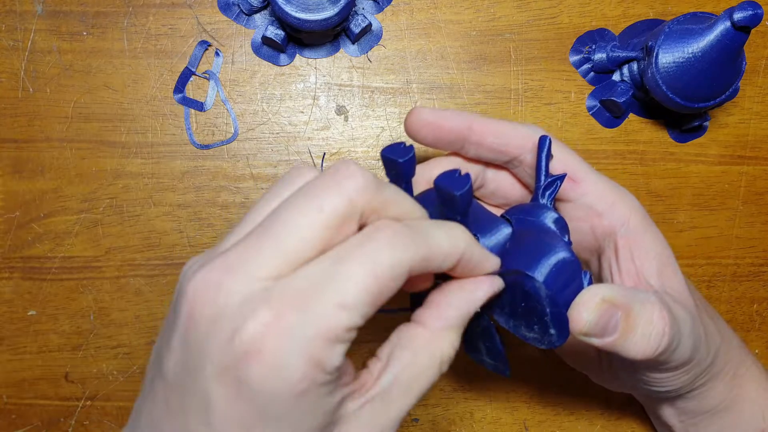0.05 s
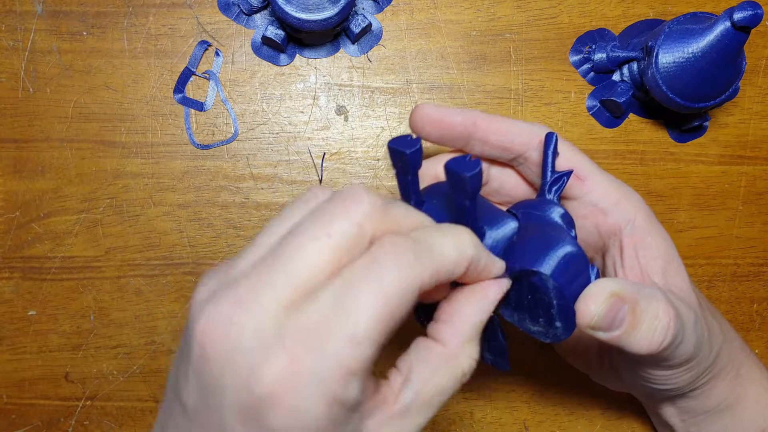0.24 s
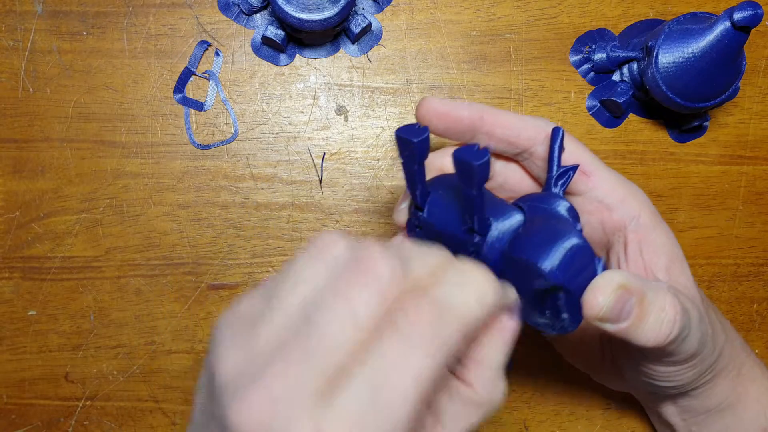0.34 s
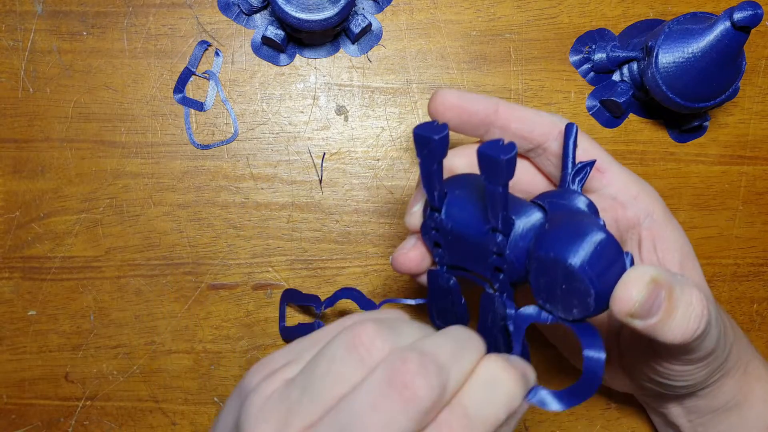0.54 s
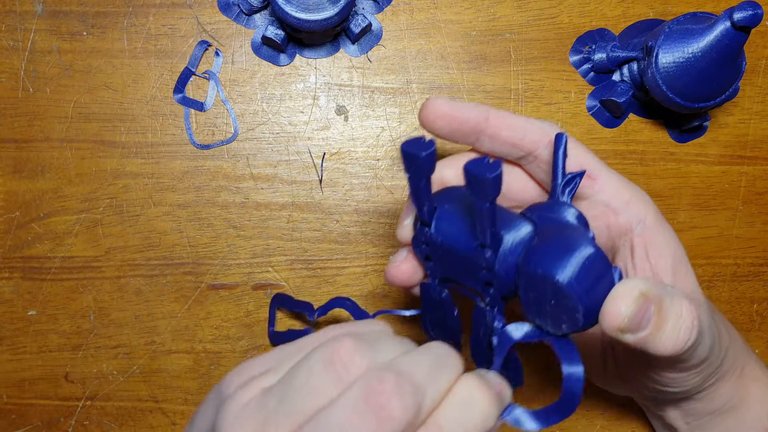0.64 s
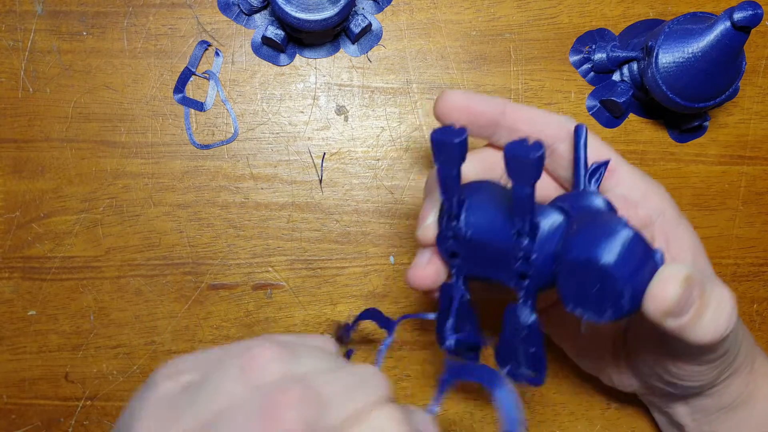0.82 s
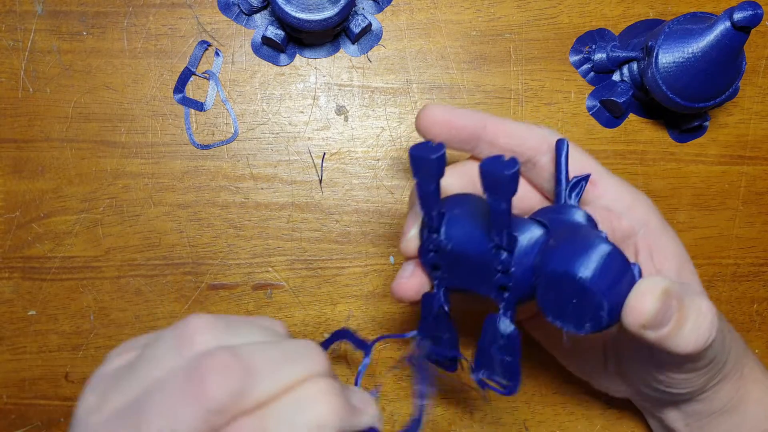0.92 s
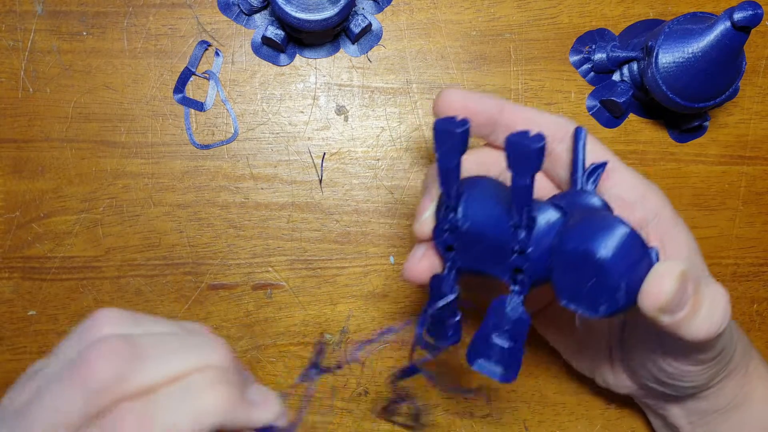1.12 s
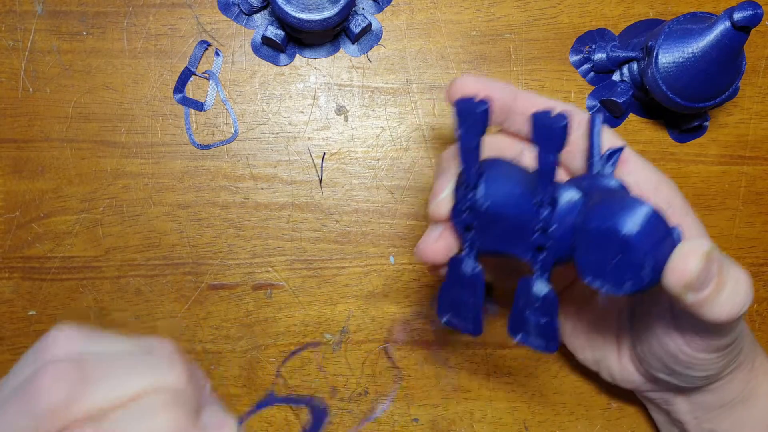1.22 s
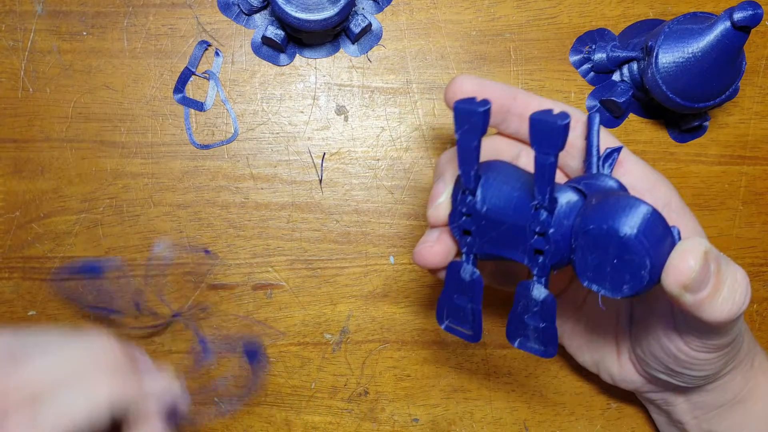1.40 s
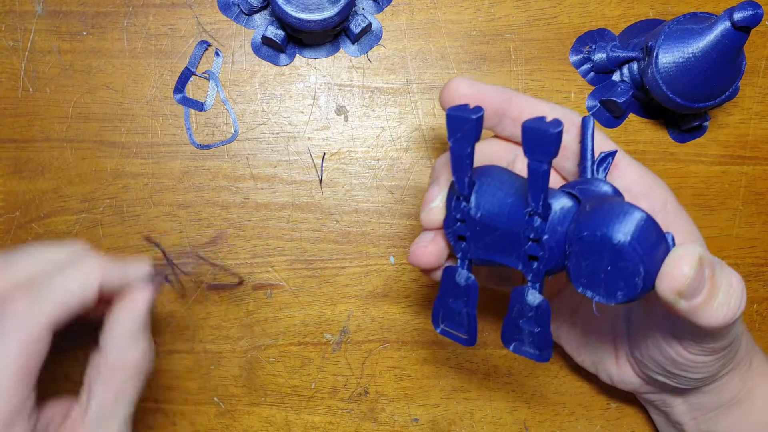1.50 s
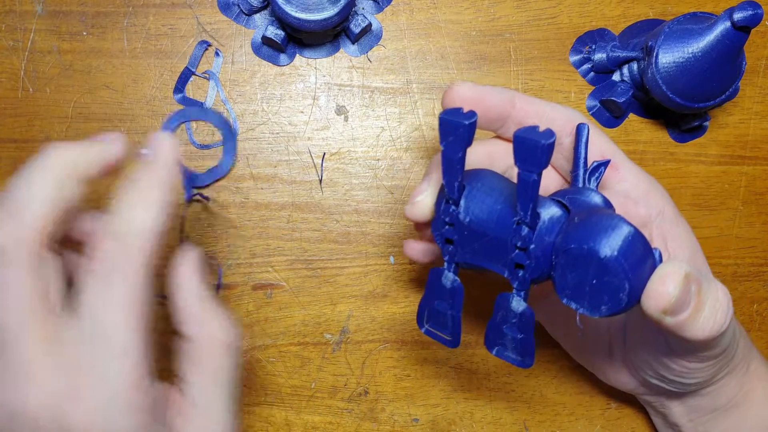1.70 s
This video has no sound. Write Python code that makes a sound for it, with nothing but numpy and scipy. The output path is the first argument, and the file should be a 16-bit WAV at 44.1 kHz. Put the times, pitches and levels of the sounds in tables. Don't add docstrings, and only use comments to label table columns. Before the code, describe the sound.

Brittle plastic bonds crack by hand, close up over a wooden table, lightly ringing the hollow figure; two bursts of snaps, a fast rip, final loud clicks, then soft rustle and low table thuds in a small quiet room.

```python
import sys
import numpy as np
from scipy import signal
from scipy.io import wavfile

SR = 44100
rng = np.random.default_rng(int(sys.argv[2]) if len(sys.argv) > 2 else 0)


def nominal_scale(level):
    x = np.asarray(level, float) / 20
    return 10 ** x


def generate_wav(signal):
    frames = np.transpose(np.atleast_2d(signal))
    scaled = np.clip(frames, -1, 1) * 32767
    pcm = np.round(scaled).astype(np.int16)
    wavfile.write(sys.argv[1], SR, pcm)


N = 77175
MID_TO_SIDES = np.array([[1], [-1]])


def rms_one(x):
    return x / np.sqrt(np.mean(x ** 2) + 1e-20)


def in_time(rows):
    return np.interp(np.arange(N) / SR, *np.transpose(rows))


def at_hz(points, hz):
    table_hz, values = np.transpose(points)
    return np.interp(np.log(hz), np.log(table_hz), values)


def band(x, low_hz, high_hz):
    edges = [low_hz, min(high_hz, 0.45 * SR)]
    return signal.sosfilt(signal.butter(2, edges, "band", fs=SR, output="sos"), x)


def ring(x, hz, t60):
    r, w = nominal_scale(-60 / (t60 * SR)), 2 * np.pi * hz / SR
    return signal.lfilter([0, np.sin(w)], [1, -2 * r * np.cos(w), r * r], x + 1e-18)


def strike(s, db, hz, t60, push=(1.0,)):
    hit = np.zeros(N)
    hit[int(s * SR)] = nominal_scale(db)
    return ring(np.convolve(hit, push / np.sum(push))[:N], hz, t60)


def lumps(rate, depth_db):
    knots = rng.standard_normal(400)
    return nominal_scale(depth_db * np.interp(np.arange(N) / SR * rate, np.arange(len(knots)), knots))


def grains(shape, share, uneven_db):
    sizes = nominal_scale(uneven_db * np.minimum(rng.exponential(1, shape), 4))
    signs = rng.choice([-1, 1], shape)
    return rms_one(sizes * signs * (rng.random(shape) < share))


# frequency in Hz, left-right likeness from 0 to 1.
LIKENESS = [(60, 0.94), (250, 0.88), (2000, 0), (6000, 0), (14000, 0)]


def coloured(source, gain_at):
    out, edges = 0, 30 * 2 ** np.arange(0, 9.6, 0.5)
    for k, (low, high) in enumerate(zip(edges, edges[1:])):
        mid, side = band(source, low, high)
        hz = np.sqrt(low * high)
        alike = np.clip(at_hz(LIKENESS, hz), -1, 1)
        pair = np.sqrt(1 + alike) * mid + np.sqrt(1 - alike) * side * MID_TO_SIDES
        out = out + (-1) ** k * gain_at(hz) * pair
    return out


# frequency in Hz, level in dB per Hz.
AIR = [(24, -65), (40, 4), (194, -2), (402, -13), (479, -5.5), (831, -21.5), (942, -17), (1070, -23),
       (3000, -36), (16000, -72)]
AIR_DB = -55


def room_tone():
    air = coloured(rng.standard_normal((2, N)), lambda hz: nominal_scale(at_hz(AIR, hz)))
    return nominal_scale(AIR_DB) * rms_one(band(air, 75, 19000))


# time in seconds, sway level in dB.
SWAY = [(0, -64), (.14, -97), (.2, -64), (.35, -74), (.5, -63), (.65, -73), (.75, -82), (.8, -54),
        (.93, -58), (.985, -38.5), (1.04, -35), (1.13, -48), (1.25, -52), (1.36, -78), (1.43, -47),
        (1.6, -50), (1.75, -57)]
SWAY_HZ, RUMBLE_DB = 26, -8.0
TABLE_LEAN = nominal_scale(np.array([[0.7], [-0.7]]))


def table_sway():
    sway = np.sqrt(2) * np.sin(2 * np.pi * SWAY_HZ * np.arange(N) / SR + 2.2)
    rumble = nominal_scale(RUMBLE_DB) * rms_one(band(rng.standard_normal(N), 62, 202))
    return nominal_scale(in_time(SWAY)) * (sway + rumble) * TABLE_LEAN


# time in seconds, tearing level in dB.
PULL = [(0, -58), (.2, -99), (.3, -57), (.34, -39.5), (.46, -26.5), (.53, -37), (.58, -56), (.66, -49.5),
        (.762, -65), (.785, -29.5), (.84, -39), (.88, -45), (.95, -59), (1.03, -27.5), (1.09, -36),
        (1.13, -46), (1.2, -43.5), (1.32, -58), (1.75, -80)]
# frequency in Hz, level in dB per Hz.
RUSTLE = [(880, -36), (1500, -10), (2930, -5), (3780, -7.5), (14600, -4.5), (16000, -7), (17000, -44.5)]
# pitch in Hz, level in dB, t60 in seconds.
FIGURE = [(524, -12.5, 0.072), (830, -8, 0.034), (1050, -20, .02), (1420, -38, .015), (1860, -13.5, 0.015),
          (2200, 12, 0.019), (3000, -21, .012), (3040, 15.5, 0.059), (3340, 14, 0.012), (3570, 1, 0.015)]
GRAINS_PER_S, RUSTLE_DB, BAND_LUMPS_DB = 26000, -14, 3.5
TEAR_BODY_DB, TEAR_DAMPING = -38, 0.2


def rustle():
    tear, pull_db = grains((2, N), GRAINS_PER_S / SR, 2.8), in_time(PULL)
    fine = coloured(tear, lambda hz: nominal_scale(at_hz(RUSTLE, hz)) * lumps(80, BAND_LUMPS_DB))
    shake = tear[0] + 0.47 * tear[1] * MID_TO_SIDES
    body = sum(nominal_scale(db) * ring(shake, hz, t60 * TEAR_DAMPING) for hz, db, t60 in FIGURE)
    body_gain = nominal_scale(np.minimum(pull_db - TEAR_BODY_DB - 17, 3.0))
    return nominal_scale(pull_db + RUSTLE_DB) * (rms_one(fine) + body_gain * rms_one(body))


# start in seconds, peak in dB, body ring in dB, sizzle in dB, strip pitch in Hz.
PICKS = [(0.0951, -43.5, -32, 0, 7100), (0.121, -34.5, -31, -2.5, 7300), (0.1467, -32, -19.5, 0, 3740),
         (0.2335, -36.5, -17.5, 7, 4000), (0.2424, -30.5, -31, 1.5, 4280), (0.281, -30, -30, 0.5, 7500),
         (0.3305, -60, -15, 17, 5640), (0.3487, -33, -57, -1, 3160), (0.3711, -35.5, -51, -0.5, 3040),
         (0.4172, -47.5, -14, 9, 2770), (0.4336, -30, -27, -3.5, 2930), (0.4561, -28.5, -25, 1.5, 11600),
         (0.4675, -25.5, -25, -5, 3630), (0.5405, -55, -30, -4, 3870), (0.5209, -17, -45, -8, 2380)]
RIP = [(0.7678, -28, -20.5, -4, 7100), (0.7718, -29, -13.5, -4, 2320), (0.7823, -19.5, -20.5, -5.5, 2190),
       (0.7901, -22.5, -48, -12, 2740), (0.7979, -17, -28, -22, 2980), (0.805, -20, -37, -4, 3500),
       (0.8184, -22.5, -15, -0.5, 2670), (0.8244, -17, -24, -10, 6600), (0.8337, -18, -39, -14, 2100),
       (0.838, -16.5, -20.5, -6.5, 2770), (0.8635, -28.5, -15.5, -19, 3140), (0.8746, -29, -9.5, -8, 3140),
       (0.8909, -23, -19, -5.5, 6330), (0.903, -29.5, -36, -11.5, 2350), (0.9226, -22, -21, -8, 3050),
       (0.9625, -28.5, -32, -6.5, 6350)]
LAST = [(1.0075, -15, -19, -5, 9360), (1.0249, -25, -17, -5.5, 6640), (1.0354, -37, -7.5, -2, 4300),
        (1.0484, -32.5, -22, 4.5, 3750), (1.0627, -21, -22.5, -3.5, 7550), (1.147, -18.5, -20.5, -4, 2990),
        (1.1967, -14, -26, -3, 3180)]
TICKS = [(1.3333, -65, -45, -7, 4900), (1.3607, -46.5, -28, -1, 7250), (1.4026, -53, -18.5, 4, 8400),
         (1.4405, -58, -18, 11, 11600), (1.467, -53, -31, -4, 4640), (1.4924, -50.5, -30, -11, 4640),
         (1.5148, -57.5, -35, -4, 10800), (1.5373, -55, -31, -16, 11800), (1.5752, -47.5, -28, -4.5, 4900),
         (1.615, -52, -37, -8, 5800), (1.65, -53, -35, -8, 11920), (1.7044, -58, -33, -12, 7330),
         (1.7269, -56, -30, -16, 6830), (1.74, -47, -28, -7, 6100)]
THREADS = [
    (.4775, -38.5, -6.5, 0, 2200),
    (1.0785, -34.5, -22.5, 2, 4600),
    (1.0808, -33.5, -34, -25, 15000),
    (1.1378, -28, -38, -3.5, 8800),
]
CLEAN = [(.4978, -25.5, -52, -4, 7300), (.5118, -19.5, -24.5, 0.5, 4450), (.5662, -26, -22.5, -2.5, 3100),
         (.8564, -13, -34, -8, 8100), (1.1013, -25.5, -27, -8, 3010), (.7842, -20.5, -17.5, -8.5, 11570),
         (.8207, -33, -11, -4, 10800), (1.1985, -12, -23, -2.5, 7910)]
CRACK_RISE_S, CRACK_SHARE, CRACK_UNEVEN_DB = 0.0012, 0.51, 1.5
CREEP_S, CREEP_SHARE = 0.003, 0.08
EDGE_DB, BODY_DB, SIZZLE_DB, STRIP_DB = -14.5, 2.5, -3.5, -17.0
STRIP_T60_S, STRIP_CYCLES, RING_CYCLES_MAX = 0.012, 30.0, 24.0
PATCH_DB, MODE_SCATTER_DB, GRIP_DETUNE = 2.0, 5, 0.09


def figure_ring(near, scatter_db, detune):
    body = 0
    for (hz, db, t60), extra_db, shift in zip(FIGURE, scatter_db, detune):
        body = body + nominal_scale(db + extra_db) * ring(near, hz * shift, min(t60, RING_CYCLES_MAX / hz))
    return band(body, 477, 5600)


def snap(shape, body_db, sizzle_db, strip_hz):
    edges = np.geomspace(3000, 20000, 8)
    mid, side = grains((2, len(shape)), CRACK_SHARE, CRACK_UNEVEN_DB) * shape
    scatter_db = MODE_SCATTER_DB * rng.standard_normal(len(FIGURE))
    patch_db = PATCH_DB * rng.standard_normal(len(edges))
    detune = np.exp(GRIP_DETUNE * rng.standard_normal(len(FIGURE)))
    near = mid + 0.35 * side * MID_TO_SIDES
    pair = np.array([mid + side, mid - side])
    body = figure_ring(near, scatter_db, detune)
    bands = [(-1) ** k * nominal_scale(patch_db[k]) * band(pair, edges[k], edges[k + 1]) for k in range(7)]
    strip = ring(near, strip_hz, min(STRIP_T60_S, STRIP_CYCLES / strip_hz))
    strip_db = STRIP_DB + 25.4 * (strip_hz > 12000)
    parts = ((body_db + BODY_DB, body), (EDGE_DB, sum(bands[:4])),
             (sizzle_db + SIZZLE_DB, sum(bands[4:])), (strip_db, strip))
    return sum(nominal_scale(db) * part / np.sqrt(np.mean(part[:, :530] ** 2)) for db, part in parts)


def snaps():
    out, t = np.zeros((4, 2, N + 4096)), np.arange(4096) / SR
    # table, rise in seconds, fall in seconds
    kinds = ((PICKS, CRACK_RISE_S, 0.003), (RIP, CRACK_RISE_S, 0.0045), (LAST, CRACK_RISE_S, 0.004),
             (TICKS, CRACK_RISE_S, 0.006), (THREADS, 0.000395, 0.00079), (CLEAN, 0.0002, 0.003))
    for rows, rise_s, fall_s in kinds:
        after = np.maximum(t - CREEP_S, 0)
        creep = CREEP_SHARE * np.minimum(t / CREEP_S, 1) ** 2
        shape = ((1 - np.exp(-after / rise_s)) ** 2 + creep) * np.exp(-after / fall_s)
        for n, (s, db, body_db, sizzle_db, strip_hz) in enumerate(rows):
            i = int((s - CREEP_S) * SR)
            out[n % 4, :, i:i + 4096] += nominal_scale(db) * snap(shape, body_db, sizzle_db, strip_hz)
    return out[..., :N]


# frequency in Hz, t60 in seconds.
ROOM_T60 = [(500, 0.28), (1300, 0.22), (3500, 0.18), (9000, 0.17), (15000, 0.13)]
ROOM_DB, ROOM_GAP_S = -4, 0.00047


def room(x):
    t = np.arange(SR // 3) / SR
    onset = np.clip(t / ROOM_GAP_S, 0, 1)
    noise = rng.standard_normal((2, len(t)))
    tail = coloured(noise, lambda hz: nominal_scale(-60 * t / at_hz(ROOM_T60, hz)) * onset)
    tail = tail / np.sqrt(np.sum(tail ** 2) / 2)
    return nominal_scale(ROOM_DB) * signal.fftconvolve(x, tail, axes=1)[:, :N]


# start in seconds, peak in dB, pitch in Hz.
PLUCKS = [(.122, -43.5, 2990), (.2824, -40.5, 3320), (.350, -39.5, 3000), (.4035, -41, 3000),
          (.438, -38, 3070), (.469, -38, 3590), (.499, -31, 4100), (.523, -46, 2390), (.524, -38, 4240),
          (.567, -29, 2850), (.785, -37, 2070), (.798, -28.5, 2990), (.820, -34, 2210), (.821, -22.5, 2720),
          (.839, -37, 2760), (.857, -23.5, 1910), (.858, -21, 3050), (0.862, -36, 4570), (0.527, -26, 3130),
          (.925, -53, 3250), (1.064, -45, 2150), (1.102, -38, 2930), (1.12, -43, 1220), (1.149, -36, 2840),
          (1.199, -21.5, 2950)]
PLUCK_T60_S = 0.024


def plucks():
    return sum(strike(s, db, hz, PLUCK_T60_S) for s, db, hz in PLUCKS)


# start in seconds, peak in dB, pitch in Hz.
KNOCKS = [
    (0.153, -50, 1340),
    (0.773, -44, 1050),
    (0.789, -43.5, 520),
    (0.846, -38, 880),
    (.925, -40, 758),
    (1.149, -44, 1080),
    (1.198, -36, 767),
]
KNOCK_T60_S, KNOCK_PUSH_S = 0.045, 0.00065


def knocks():
    push = np.hanning(int(KNOCK_PUSH_S * SR))
    return 2 * sum(strike(s, db, hz, KNOCK_T60_S, push) for s, db, hz in KNOCKS)


# start in seconds, peak in dB, pitch in Hz.
THUDS = [
    (0.155, -43, 81),
    (0.238, -42, 84.4),
    (0.519, -43.5, 81),
    (0.786, -35.5, 73),
    (0.988, -37, 109),
    (1.032, -33.5, 75),
    (1.091, -37, 75),
    (1.212, -50, 70),
    (1.488, -49, 67),
    (1.56, -46, 82.6),
]
THUD_T60_S, THUD_PUSH_S = 0.17, 0.0078


def table_thuds():
    push = np.hanning(int(THUD_PUSH_S * SR))
    booms = sum(strike(s, db, hz, THUD_T60_S, push) for s, db, hz in THUDS)
    return 2 * band(booms, 68, 300) * TABLE_LEAN


# time in seconds, level in dB.
RUB = [(1.25, -53), (1.32, -54.5), (1.39, -66.5), (1.41, -51.5), (1.47, -51.5), (1.5, -71), (1.57, -63),
       (1.59, -56), (1.7, -67), (1.75, -53)]
# frequency in Hz, level in dB per Hz.
RUB_COLOUR = [(2000, -24), (3800, -10), (5000, -1.5), (8500, -13.5), (12000, -10.5), (16000, 6)]
RUB_START_S, RUB_LUMPS_DB = 1.2, 3.5


def rub():
    skin = grains((2, N), 0.23, 4.0) * (np.arange(N) > RUB_START_S * SR)
    friction = coloured(skin, lambda hz: nominal_scale(at_hz(RUB_COLOUR, hz)) * lumps(40, RUB_LUMPS_DB))
    return nominal_scale(in_time(RUB)) * rms_one(band(friction, 4200, 24500))


# time in seconds, left-over-right balance in dB.
SIDEWAYS = [(0, 4), (.12, 0.5), (.15, 2.5), (.24, 0), (.28, 2), (.34, 0), (.5, 2.5), (.8, 2.4), (.95, 0),
            (1.01, 2), (1.08, 1.5), (1.14, 2), (1.2, 1.2), (1.75, 3)]
LUMPS_PER_S, LUMPS_DB = 37, 3


def scene():
    lean = nominal_scale(np.array([[0.5], [-0.5]]) * in_time(SIDEWAYS))
    places = (snaps() + (plucks() + knocks()) / 4) * lean
    near = sum(place + room(place) for place in places)
    strip = rustle() * lean * lumps(LUMPS_PER_S, LUMPS_DB) + rub() * lean
    return near + strip + table_sway() + table_thuds() + room_tone()


def band_limit(x):
    return signal.sosfilt(signal.butter(12, 17140, fs=SR, output="sos"), x)


def record(dry):
    mix = signal.sosfilt(signal.cheby1(10, 1, 15850, fs=SR, output="sos"), dry)
    return band_limit(mix)


dry = scene()
out = record(dry)
generate_wav(out)
```